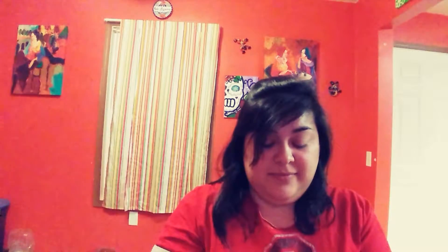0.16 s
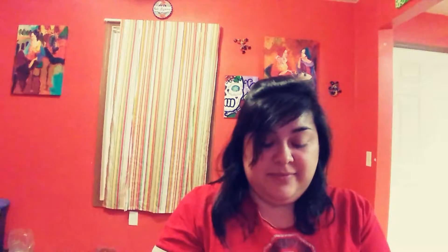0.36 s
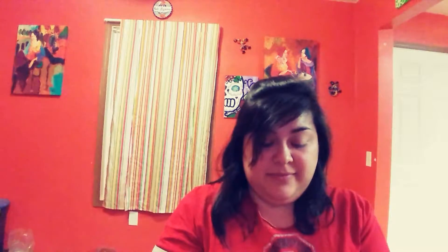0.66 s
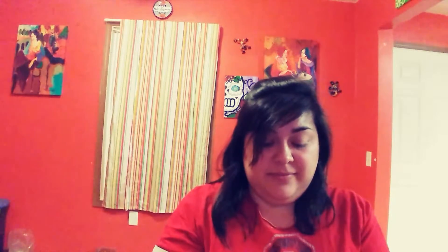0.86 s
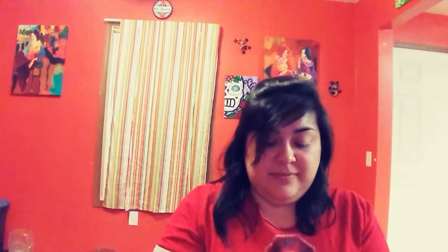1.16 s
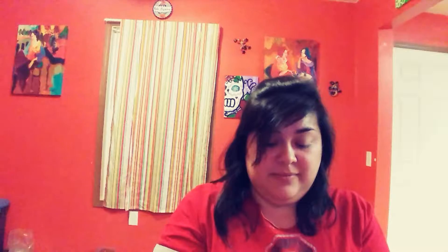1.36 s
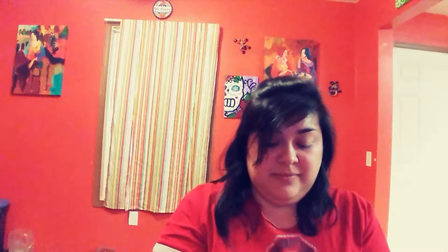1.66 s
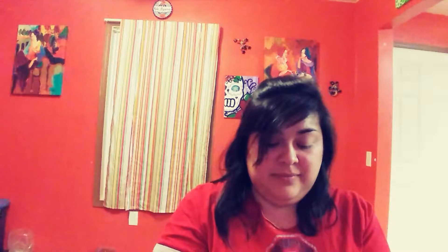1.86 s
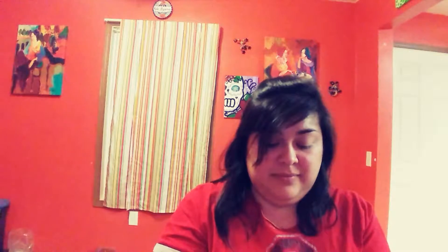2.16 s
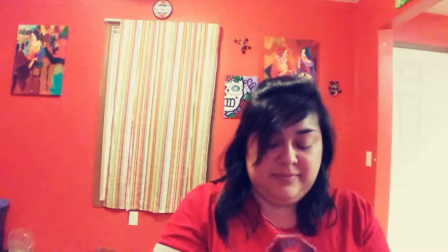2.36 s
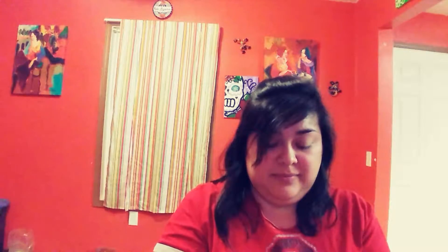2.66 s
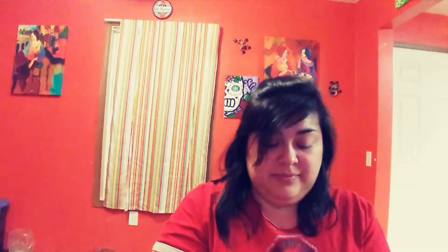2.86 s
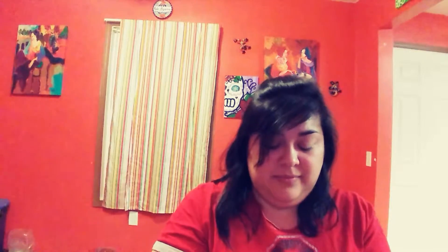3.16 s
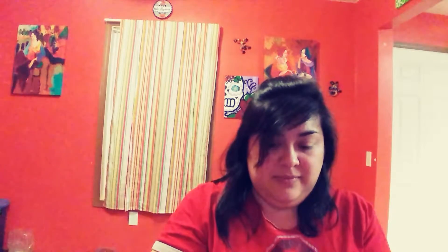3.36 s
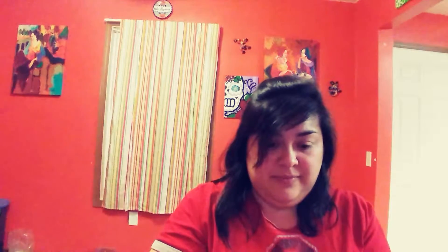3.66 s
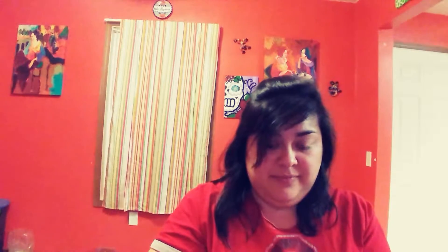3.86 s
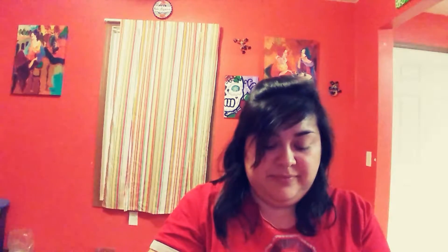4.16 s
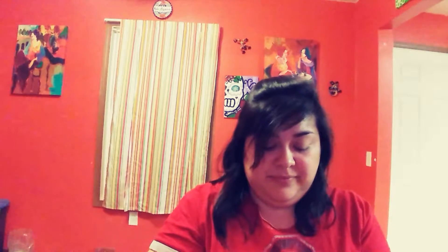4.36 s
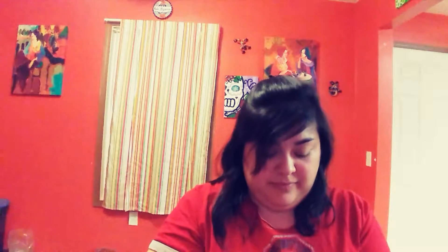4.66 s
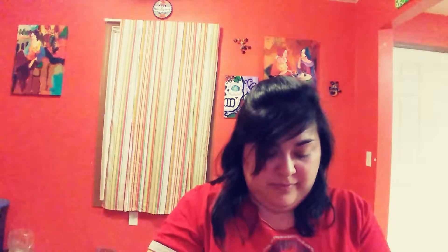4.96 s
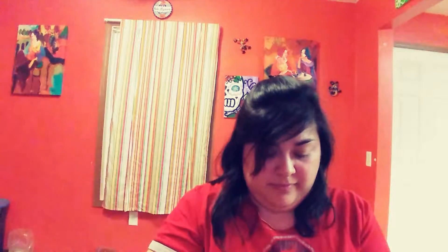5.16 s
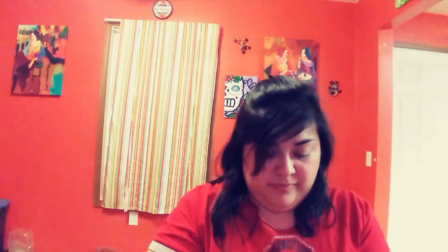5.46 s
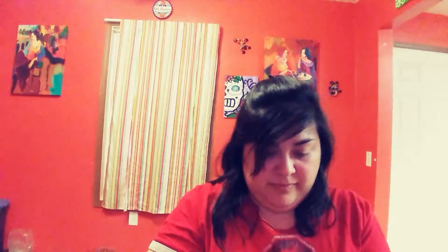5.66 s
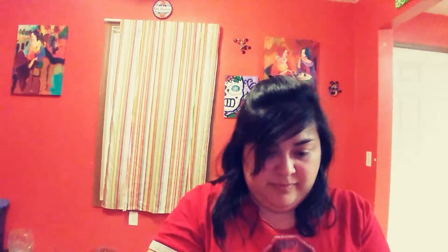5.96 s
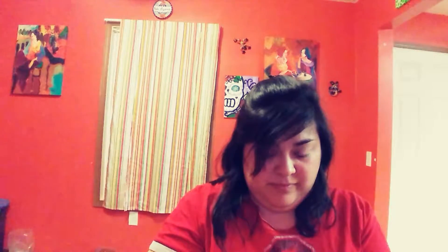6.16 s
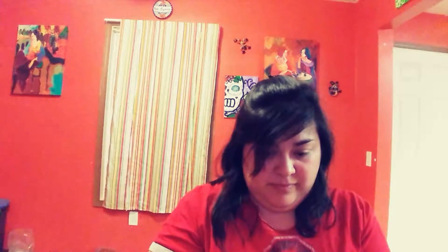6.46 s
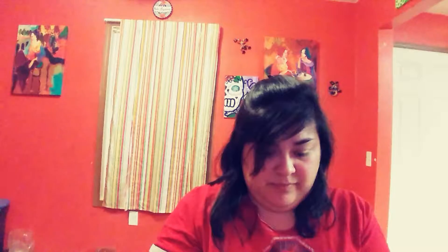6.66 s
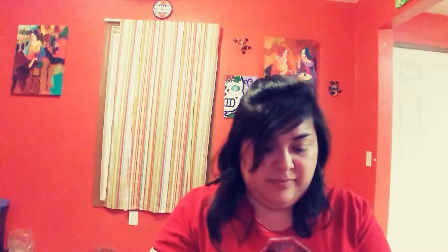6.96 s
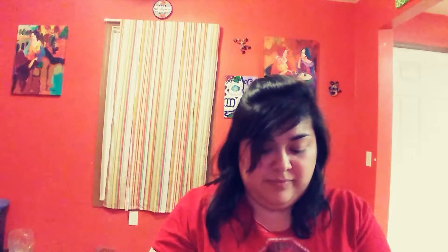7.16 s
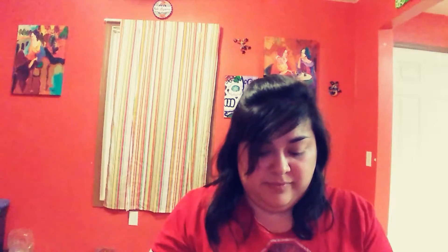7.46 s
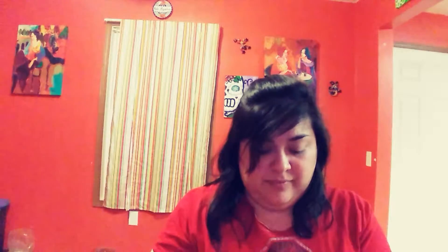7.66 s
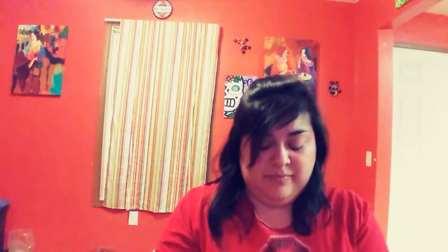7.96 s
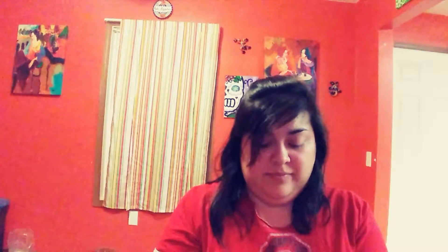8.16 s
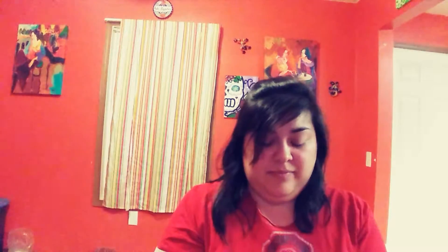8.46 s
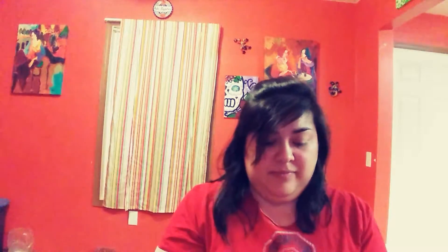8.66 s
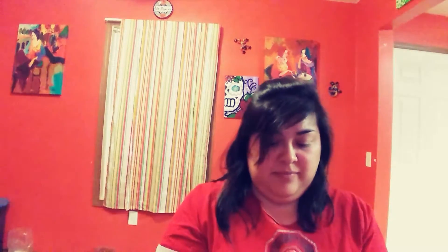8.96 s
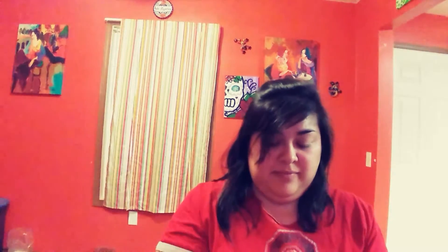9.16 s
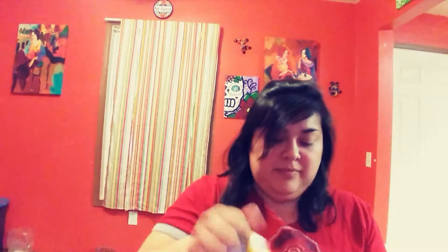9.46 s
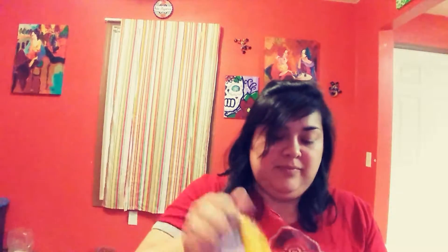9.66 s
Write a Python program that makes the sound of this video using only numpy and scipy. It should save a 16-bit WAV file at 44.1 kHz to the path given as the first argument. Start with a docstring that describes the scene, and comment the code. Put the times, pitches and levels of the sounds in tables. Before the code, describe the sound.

A small indoor room with faint low ventilation rumble and a slightly wavering appliance hum throughout. Very close, a plastic snack bag is handled. From 0 to 1.4 seconds there are only light, sparse crackles and small ticks with gaps, plus a soft dull scrape or two. From about 1.5 seconds the squeezes grow busier, with crisp film rustle and sharp fold snaps, thickest around 2 seconds, then continuing in irregular clusters through 6.5, with a few low, dull knocks near 2.6, 3.2, 5.6 and 5.9. It thins around 6.6 to 7.3. At about 7.4 shaking begins, jumping louder at 7.55: dry noodles rattle against the film in rapid, uneven bursts, with hard snaps and hollow knocks until 8.8. From 9 it intensifies into a dense, loud rattle, strongest from 9.4 to the abrupt end near 10. Clicks are bright and glinting; room reflections are short.

```python
"""A plastic snack bag is handled close to the microphone in a small room: each squeeze crackles with
tiny impacts in the film, and larger folds snap with a tick and a short ring. Hands slide on it in dull
scrapes and lumps knock now and then; from 7.4 s it is shaken, harder towards the end, and the dry noodles
rattle. Behind it lie filtered-noise ventilation rumble and the wavering tones of an appliance.
The microphone port rings near 10 kHz, which makes every click glint."""
import sys
import numpy as np
from scipy import signal
from scipy.fft import rfft, irfft
from scipy.io import wavfile
from scipy.ndimage import uniform_filter1d

SR = 44100
rng = np.random.default_rng(int(sys.argv[2]) if len(sys.argv) > 2 else 0)


def waveform_to_disk(signal):
    """Save audio, clipped to [-1, 1], as 16-bit WAV at the path in sys.argv[1]."""
    frames = np.transpose(np.atleast_2d(signal))
    scaled = np.clip(frames, -1, 1) * 32767
    samples = np.round(scaled).astype(np.int16)
    wavfile.write(sys.argv[1], SR, samples)


N = 432180  # 9.8 s
TIME = np.arange(N) / SR


def undb(db):
    """Decibels to gain."""
    return 10 ** (np.asarray(db) / 20)


def unit(x):
    """Scale to rms 1."""
    return x / np.sqrt(np.mean(x ** 2))


def colour(x, points, size=1024):
    """Causal minimum-phase filter through (Hz, dB) points that keeps the power of white noise."""
    hz, db = np.transpose(points)
    bin_hz = np.maximum(np.fft.rfftfreq(size, 1 / SR), 1)
    gain = undb(np.interp(np.log(bin_hz), np.log(hz), db))
    # folding the cepstrum onto positive time puts the energy of the response first
    cepstrum = irfft(np.log(gain))
    cepstrum[1:size // 2] *= 2
    cepstrum[size // 2 + 1:] = 0
    response = irfft(np.exp(rfft(cepstrum)))
    return signal.oaconvolve(x, response / np.linalg.norm(response))[:len(x)]


def add(track, s, sound):
    """Mix a sound into a track at time s."""
    start = int(np.clip(round(s * SR), 0, N - 1))
    track[start:start + len(sound)] += sound[:N - start]


def walk(rate):
    """Smooth random wander with a spread near 1 and rate new targets per second."""
    hold = int(SR / rate)
    steps = np.repeat(rng.standard_normal(N // hold + 1), hold)[:N]
    return 1.66 * uniform_filter1d(steps, hold)  # smoothing narrows the spread, 1.66 restores it


def burst(x, db):
    """Give a short sound the energy of 1 ms at this level."""
    return x * undb(db) * np.sqrt(SR / 1000 / np.sum(x ** 2))


def impacts(rate, spread_db):
    """Energies of random tiny impacts, rate per second: many weak, a few strong."""
    happens = rng.random(N) < rate / SR
    strength_db = spread_db * np.minimum(rng.exponential(size=N), 3.3)
    return happens * undb(strength_db) ** 2


def grains(energy, decay_s, even_s):
    """Each impact sets off a short dying noise burst; the mean power over about even_s stays near 1."""
    power = signal.lfilter([1], [1, -np.exp(-2 / (decay_s * SR))], energy + 1e-9)
    mean = uniform_filter1d(power, int(even_s * SR))
    mean = uniform_filter1d(mean, int(even_s * SR / 2))
    return np.sqrt(power / np.maximum(mean, 1e-9)) * rng.standard_normal(N)


def flexing(x, depth_db, rate, count=9):
    """The bag changes shape all the time, so its resonances come and go band by band."""
    bin_hz = np.fft.rfftfreq(N, 1 / SR)
    place = np.interp(np.log(bin_hz + 1), np.log([300, 8000]), [0, count - 1])
    spectrum, out = rfft(x), 0
    for band in range(count):
        share = np.maximum(1 - np.abs(place - band), 0)
        out = out + irfft(spectrum * share, N) * unit(undb(depth_db * walk(rate)))
    return out


# Colour of the low rumble. Each row: frequency in Hz, relative level in dB.
RUMBLE_COLOUR = [(24, -40.5), (40, -26), (54, -3), (66, 5.5), (78, -1.5), (100, -5), (145, -1.5),
                 (185, -13), (300, -16.5), (380, -16.5), (550, -25), (1000, -31), (3000, -34),
                 (16000, -48.5)]
# Steady tones of the appliance. Each row: pitch in Hz, rms level at the microphone in dB.
HUM_TONES = [(64.6, -50.5), (119.9, -52.5), (204.6, -64.5), (258.4, -57.5), (323.0, -61)]


def background(noise_db=-45.5, waver=0.56):
    """Low ventilation rumble and appliance tones whose phase wavers slightly (in radians)."""
    rumble = unit(colour(rng.standard_normal(N), RUMBLE_COLOUR, size=16384)) * undb(noise_db)
    hum = np.zeros(N)
    for hz, db in HUM_TONES:
        hum += np.sqrt(2) * undb(db) * np.sin(2 * np.pi * hz * TIME + waver * walk(3))
    return rumble + hum


# Every movement of the hands swells, sags while it lasts and dies away.
ATTACK_S, SAG_DB_PER_S, RELEASE_S = 0.007, 7, 0.023


def movements(rows, column, attack_s=ATTACK_S):
    """Power over time of the movements: linear swell, steady sag in dB, exponential release."""
    power, t = np.zeros(N), np.arange(SR // 2) / SR
    for row in rows:
        start, length = row[:2]
        swell = np.minimum(t / attack_s, 1)
        release = np.exp(-np.maximum(t - length, 0) / RELEASE_S)
        level_db = row[column] - SAG_DB_PER_S * (t - length / 2)  # the listed level holds midway
        add(power, start, (swell * release * undb(level_db)) ** 2)
    return power


# The fingers squeeze the bag, close to the microphone.
# Each row: start in seconds, length in seconds, nominal film rustle in dB, nominal fine crackle in dB.
FINGER_SQUEEZES = [(0.0, 0.047, -49, -43), (0.07, 0.11, -49.5, -55.5), (0.24, 0.085, -51, -65),
                   (0.588, 0.073, -51, -54.5), (0.765, 0.25, -48.5, -52.5), (0.932, 0.029, -38.5, -44),
                   (1.25, 0.21, -60, -65), (1.41, 0.063, -49, -48), (1.595, 0.052, -42.5, -44),
                   (1.76, 0.096, -38, -36), (1.89, 0.04, -37.5, -33), (1.96, 0.23, -43, -43.5),
                   (2.21, .15, -42, -39.5), (2.43, 0.22, -47, -45.5), (2.735, 0.02, -42, -39.5),
                   (2.82, 0.054, -44.5, -55), (3.045, 0.042, -43, -52), (3.16, 0.17, -46, -52.5),
                   (3.49, 0.17, -48, -44), (3.67, 0.19, -48.5, -47), (3.83, 0.042, -52, -44),
                   (4.025, 0.084, -43.5, -39), (4.29, 0.13, -47.5, -40.5), (4.57, 0.033, -39, -45),
                   (4.63, 0.054, -46, -45), (4.9, .07, -42, -38.5), (5.02, .05, -43, -44),
                   (5.155, .13, -39.5, -40.5), (5.432, 0.051, -39.5, -33.5), (5.49, 0.079, -43, -52),
                   (5.625, 0.077, -39.5, -34), (5.745, 0.14, -48, -49.5), (5.875, 0.05, -37, -40),
                   (5.912, 0.013, -36.5, -31.5), (6.04, 0.077, -38.5, -42), (6.226, .14, -45, -47.5),
                   (6.41, 0.09, -47, -53), (6.53, 0.025, -44.5, -50), (6.8, 0.022, -49, -46.5),
                   (7.025, 0.027, -38.5, -44), (7.11, 0.053, -43, -52)]
# Shakes throw the noodles against the film.
# Each row: start in seconds, length in seconds, nominal film rustle in dB, nominal fine crackle in dB.
BAG_SHAKES = [(7.379, 0.2, -41.5, -48.5), (7.56, 0.075, -32, -32), (7.653, 0.23, -34.5, -33.5),
              (7.815, 0.04, -27.5, -27.5), (7.888, 0.076, -33, -35), (8.009, 0.3, -36, -37),
              (8.268, .08, -34, -31.5), (8.365, 0.095, -36.5, -47), (8.567, 0.073, -36.5, -42.5),
              (8.666, 0.16, -37, -36), (8.774, 0.1, -37.5, -30.5), (8.941, 0.06, -34.5, -29.5),
              (9.01, 0.073, -37, -40), (9.17, 0.1, -33.5, -36.5), (9.239, 0.053, -30.5, -31.5),
              (9.349, 0.066, -28, -31.5), (9.424, 0.05, -23, -29), (9.494, 0.081, -30.5, -44),
              (9.544, 0.054, -27, -26.5), (9.647, 0.046, -23, -25), (9.765, 0.033, -25.5, -25)]
# The bag never lies quite still in the hands.
# Each row: time in seconds, nominal level of the film's faint rustle in dB.
RESTING_GRIP = [(0, -45.5), (.55, -69), (1.2, -59), (1.8, -46.5), (2.6, -51), (2.95, -58.5), (3.2, -53.5),
                (4.5, -51), (6.4, -50), (6.7, -65), (7.3, -60.5), (7.6, -49), (8.5, -45), (9.1, -37.5),
                (9.8, -26)]
CRACKLE_IN_GRIP_DB = -5  # fine crackle of the resting grip, relative to its rustle
SLACK_DB, NOODLES_DB = -9, -5  # low rustle relative to the film: in a squeeze; in a shake or at rest


def handling():
    """Levels in dB of fine crackle, film rustle and low rustle, as grip, squeezes and shakes drive them."""
    squeeze = movements(FINGER_SQUEEZES, column=2)
    shake = movements(BAG_SHAKES, column=2)
    crackle = movements(FINGER_SQUEEZES + BAG_SHAKES, column=-1)
    grip = undb(np.interp(TIME, *np.transpose(RESTING_GRIP))) ** 2
    fine = crackle + grip * undb(CRACKLE_IN_GRIP_DB) ** 2
    film = squeeze + shake + grip
    low = squeeze * undb(SLACK_DB) ** 2 + (shake + grip) * undb(NOODLES_DB) ** 2
    return 10 * np.log10([fine, film, low])


# Colour of the sharp ticks, in creases and snaps. Each row: frequency in Hz, relative level in dB.
TICK_COLOUR = [(2000, -85), (5000, -9), (7500, -2.5), (9500, 0.5), (12000, -2.5), (16000, -4.5)]
# Colour of the ringing film, in creases and snaps. Each row: frequency in Hz, relative level in dB.
FILM_COLOUR = [(500, -12.5), (1200, -3), (2200, 0.5), (3400, 1), (5500, -0.5), (7000, -3), (10000, -10.5),
               (16000, -5)]
# Colour of the slack bag and the noodles in it. Each row: frequency in Hz, relative level in dB.
NOODLE_COLOUR = [(120, -23), (250, -2), (350, 6.5), (480, 5), (650, 7.5), (950, 4), (1500, 0), (2300, -4.5),
                 (5000, -20)]


def crinkle():
    """Countless small creases and crumbs: sparse under a light touch, crowded when the bag is shaken."""
    fine_db, film_db, rattle_db = handling()
    effort = np.clip((film_db + 63.5) / 38, 0, 1)
    creases = impacts(rate=140 + 2200 * effort ** 3, spread_db=4.5)
    crumbs = impacts(rate=590, spread_db=2.5)
    # each crease ticks at once and rings the film; the slack bag and its contents answer lower
    ticks = grains(creases, decay_s=0.00038, even_s=0.1)
    rings = grains(creases, decay_s=0.0049, even_s=0.068)
    rattles = grains(creases + crumbs, decay_s=0.0043, even_s=0.034)
    fine = colour(ticks, TICK_COLOUR) * undb(fine_db - 0.9)
    film = colour(rings, FILM_COLOUR) * undb(film_db + 1.1)
    rattle = colour(rattles, NOODLE_COLOUR) * undb(rattle_db + 0.3)
    return fine + flexing(film + rattle, depth_db=2.0, rate=40)


# Large folds of the film snap through. Each row: time in seconds, nominal level of the tick in dB,
# nominal level of the film's ring in dB, both as energy in 1 ms.
FOLD_SNAPS = [(0.0344, -25, -35), (0.236, -29, -43), (0.2623, -30, -39), (0.3334, -42, -33.5),
              (0.5877, -38.5, -39), (0.774, -28.5, -42), (1.418, -27, -31), (1.4567, -31, -41),
              (1.5812, -31, -31), (1.6179, -22, -25), (1.6487, -25, -33), (1.7677, -38, -25.5),
              (1.838, -25, -30), (1.907, -22, -29), (2.022, -19.5, -28), (2.0406, -16.5, -21),
              (2.1405, -19, -25.5), (2.223, -18.5, -31), (2.247, -19, -21.5), (2.3244, -20.5, -27),
              (2.3586, -22, -25.5), (2.4207, -32, -26.5), (2.6106, -17.5, -25), (2.6745, -28.5, -40),
              (2.821, -31, -34.5), (2.866, -37, -28.5), (2.933, -35, -45), (3.0005, -30, -29.5),
              (3.0456, -23, -29), (3.062, -18, -43), (3.0886, -19.5, -37), (3.2298, -32, -23.5),
              (3.3118, -23, -49), (3.3302, -33, -27), (3.353, -25.5, -29), (3.4585, -43, -29),
              (3.4954, -28.5, -28), (3.5546, -30, -45), (3.5665, -24.5, -29), (3.6763, -28, -23),
              (3.7734, -32.5, -42), (3.8343, -22.5, -32), (3.8539, -24, -25), (3.8654, -21, -40),
              (4.0325, -23.5, -44), (4.074, -21, -28), (4.107, -25.5, -34), (4.2464, -31, -42),
              (4.2993, -29, -26.5), (4.3472, -26, -28), (4.385, -26, -26.5), (4.417, -20.5, -20.5),
              (4.4775, -15.5, -29), (4.558, -27, -35), (4.5742, -22, -27), (4.5927, -15, -31),
              (4.7256, -17.5, -35), (4.7515, -26, -43), (4.8354, -30, -31), (4.9153, -36, -30),
              (5.0212, -21, -29), (5.0421, -22, -22.5), (5.062, -17.5, -39), (5.1556, -22, -26.5),
              (5.1677, -27, -24), (5.2258, -19, -23), (5.2714, -14.5, -23), (5.4442, -16.5, -26),
              (5.5887, -23.5, -37), (5.6406, -21.5, -30), (5.6627, -19, -29.5), (5.6816, -19.5, -22.5),
              (5.764, -25.5, -22.5), (5.8233, -23, -37), (5.862, -37, -25), (5.9214, -26, -34),
              (6.263, -27.5, -31), (6.3527, -26.5, -25.5), (6.4832, -35, -31), (6.535, -22.5, -27.5),
              (6.678, -45, -41.5), (6.893, -33, -36), (6.919, -28.5, -40), (6.9779, -34, -32.5),
              (7.0261, -42, -23.5), (7.051, -31, -24.5), (7.117, -20, -23), (7.376, -31, -30.5),
              (7.4194, -26, -23.5), (7.563, -13.5, -17), (7.607, -15, -17), (7.662, -20, -19),
              (7.724, -23, -33), (7.844, -16, -19), (7.9408, -19.5, -17), (8.0215, -23, -28),
              (8.086, -19, -20), (8.1072, -11, -19.5), (8.2727, -11.5, -16.5), (8.327, -19, -20),
              (8.413, -15.5, -22), (8.5765, -20.5, -20), (8.6734, -17, -17), (8.69, -15, -19),
              (8.7817, -19, -12), (8.8616, -28, -26), (8.9386, -14, -15), (8.981, -13.5, -15),
              (9.0286, -14.5, -39), (9.3465, -14, -15), (9.3545, -13, -21), (9.759, -19, -20)]


def snaps(tick_s=0.0019, flutter=0.19, ring_s=0.0018, facets=0.22, tick_db=-1, ring_db=0, count=6, size=512):
    """A fold flips with one sharp tick, and the facets around it ring briefly at their own pitches."""
    ticks, rings = np.zeros(N), np.zeros(N)
    t = np.arange(size) / SR
    for s, sharp_db, film_db in FOLD_SNAPS:
        tick = flutter * rng.standard_normal(size) * np.exp(-t / tick_s)
        tick[0] = 1
        facet_hz = rng.uniform(1716, 7650, (count, 1))
        tones = np.sin(2 * np.pi * facet_hz * t).sum(axis=0)
        ring = facets * tones + rng.standard_normal(size)
        add(ticks, s, burst(tick, sharp_db + tick_db))
        add(rings, s, burst(ring * np.exp(-t / ring_s), film_db + ring_db))
    return colour(ticks, TICK_COLOUR) + colour(rings, FILM_COLOUR)


# Hands, and later the contents, slide along the bag.
# Each row: start in seconds, length in seconds, nominal level in dB.
BAG_SLIDES = [(0.33, 0.12, -51.5), (0.774, 0.13, -46), (1.249, 0.2, -47), (2.436, 0.18, -50.5),
              (5.62, 0.052, -46), (5.893, 0.052, -45), (7.027, 0.033, -49), (7.37, .17, -42),
              (7.66, 0.25, -39), (8.275, .06, -45), (8.662, .05, -37), (9.42, 0.072, -36),
              (9.64, 0.077, -30)]
# Colour of their dull swish. Each row: frequency in Hz, relative level in dB.
SWISH_COLOUR = [(150, -29), (400, -2.5), (700, 2.5), (1100, -2), (1600, -2.5), (2500, -11), (4200, -18.5),
                (8000, -25)]


def slides(attack_s=0.02):
    """Hands or contents rub along the film in many small, dull scrapes."""
    scrapes = grains(impacts(rate=450, spread_db=3.5), decay_s=0.0037, even_s=0.05)
    swish = flexing(colour(scrapes, SWISH_COLOUR), depth_db=2.0, rate=30)
    return swish * np.sqrt(movements(BAG_SLIDES, 2, attack_s))


# Larger lumps knock against the bag.
# Each row: time in seconds, nominal peak level in dB, central pitch in Hz.
LUMP_KNOCKS = [(2.609, -32, 357), (3.228, -38, 334), (5.624, -28.5, 590), (5.892, -29.5, 568),
               (7.687, -23, 930), (7.815, -20, 1236), (8.059, -21.5, 725), (8.279, -23.5, 636),
               (8.315, -21, 663), (8.603, -23.5, 1310), (8.772, -28, 540)]


def knocks(decay_s=0.0074, octaves=0.66, knock_db=1, count=14, size=4096):
    """A lump hits the slack bag: a cluster of dull, close modes around one pitch."""
    out, t = np.zeros(N), np.arange(size) / SR
    place = np.linspace(-1, 1, count)[:, None]
    for s, db, hz in LUMP_KNOCKS:
        mode_hz = hz * 2 ** (octaves * place + 0.029 * rng.standard_normal((count, 1)))
        weight = rng.choice([-1, 1], (count, 1)) * np.exp(-place ** 2)
        modes = (weight * np.sin(2 * np.pi * mode_hz * t)).sum(axis=0)
        knock = modes * np.exp(-t / decay_s)
        add(out, s, knock / np.abs(knock).max() * undb(db + knock_db))
    return out


# First reflections from the table and the body.
# Each row: delay in seconds, level relative to the direct sound in dB.
NEAR_ECHOES = [(.0032, -20), (.0069, -19.5), (.0087, -29.5), (0.0096, -16)]


def room(x, t60_s=0.39, tail_db=-8, build_s=0.0055, drift=1.69, count=3, size=20000):
    """Direct sound, near reflections and a short diffuse tail that changes as the bag turns."""
    t = np.arange(size) / SR
    near = np.zeros(size)
    near[0] = 1
    for delay, db in NEAR_ECHOES:
        near[int(delay * SR)] += undb(db)
    out = signal.oaconvolve(x, near)[:N]
    # wandering shares of constant total power feed three different tails
    facing = np.array([walk(drift) for _ in range(count)])
    for share in facing / np.linalg.norm(facing, axis=0):
        decay = np.exp(-np.log(1000) * t / t60_s)
        tail = rng.standard_normal(size) * decay * (1 - np.exp(-t / build_s))
        tail = tail / np.linalg.norm(tail)
        out = out + signal.oaconvolve(x * share, tail)[:N] * undb(tail_db)
    return out


def scene():
    """The bag in its room, with the background behind it."""
    bag = crinkle() + snaps() + slides() + knocks()
    return (room(bag) + background())[None]


def record(dry, ring_hz=9800, width_hz=1200, top_hz=16000):
    """The microphone port resonates in the treble; the highest peaks are rounded and the top is cut."""
    f = np.fft.rfftfreq(N, 1 / SR)
    port = 1 / (1 - (f / ring_hz) ** 2 + 1j * f * width_hz / ring_hz ** 2)
    heard = irfft(rfft(dry) * port, N)
    rounded = heard / (1 + (heard / 0.9) ** 4) ** 0.25
    top_cut = signal.ellip(10, 0.2, 80, top_hz, fs=SR, output="sos")
    return signal.sosfilt(top_cut, rounded)


dry = scene()
out = record(dry)
waveform_to_disk(out)
```